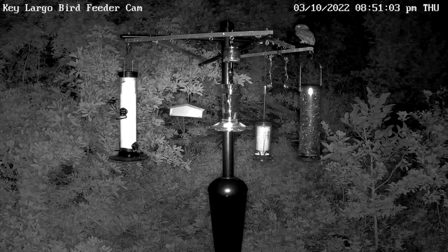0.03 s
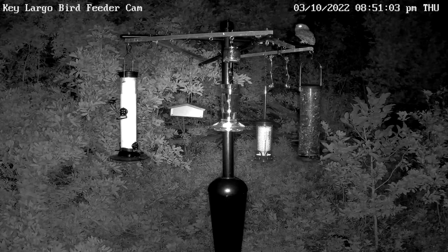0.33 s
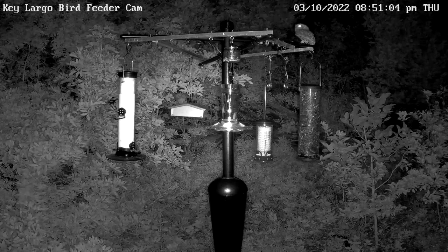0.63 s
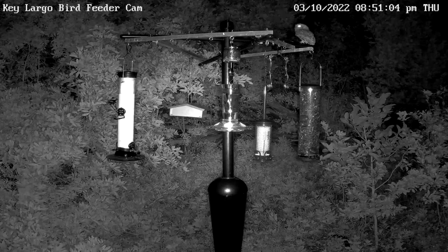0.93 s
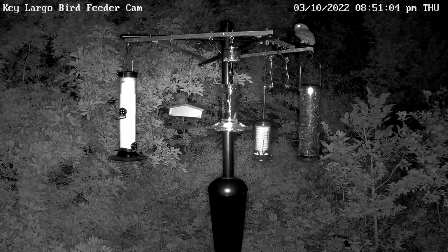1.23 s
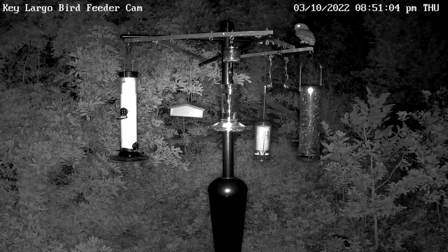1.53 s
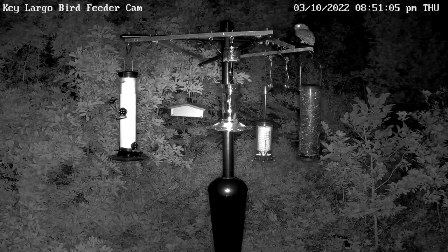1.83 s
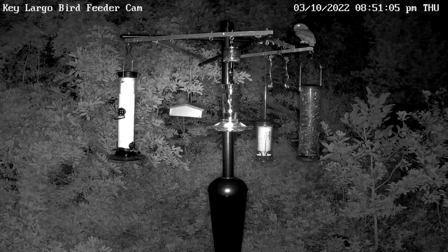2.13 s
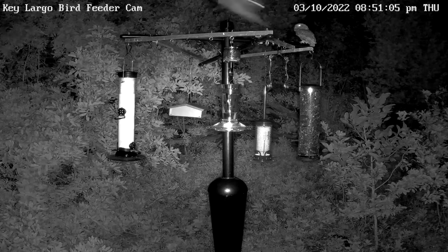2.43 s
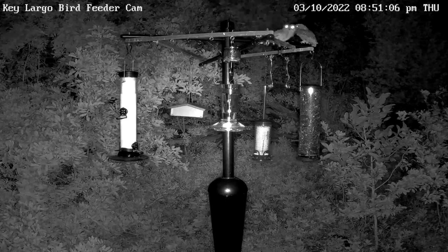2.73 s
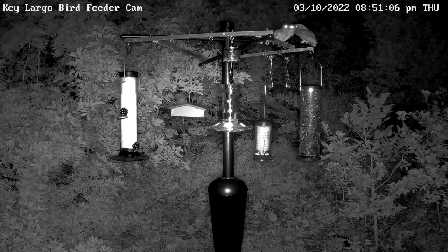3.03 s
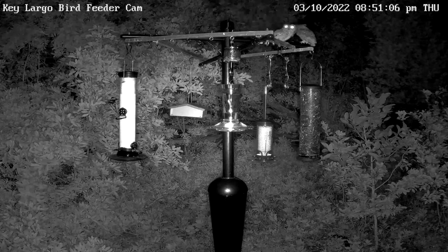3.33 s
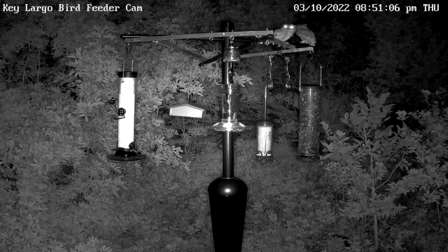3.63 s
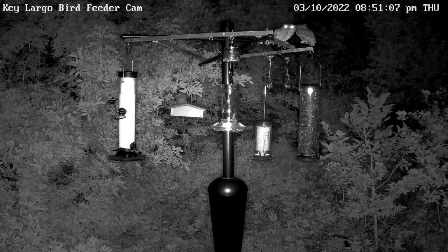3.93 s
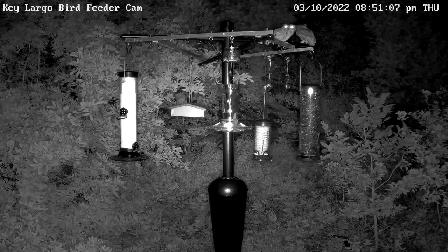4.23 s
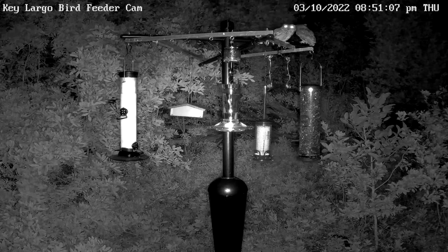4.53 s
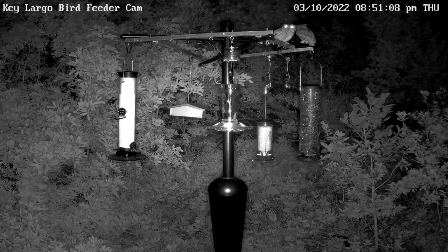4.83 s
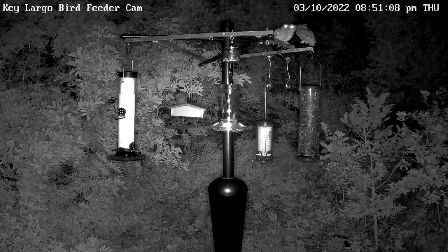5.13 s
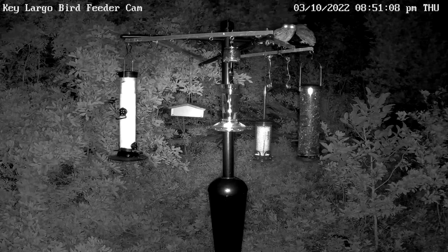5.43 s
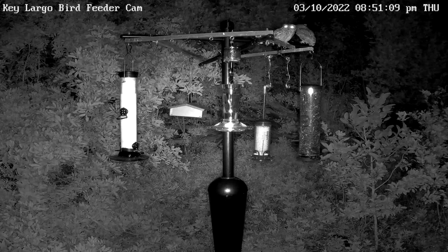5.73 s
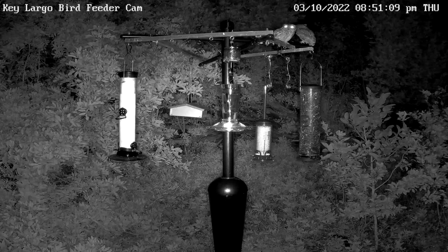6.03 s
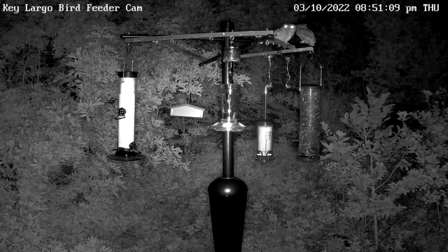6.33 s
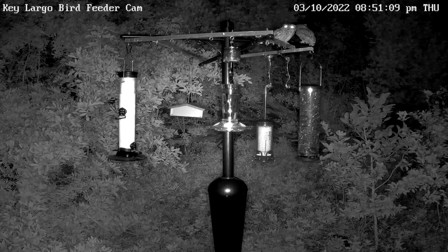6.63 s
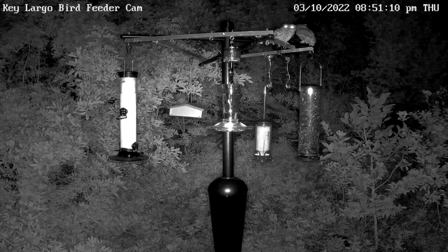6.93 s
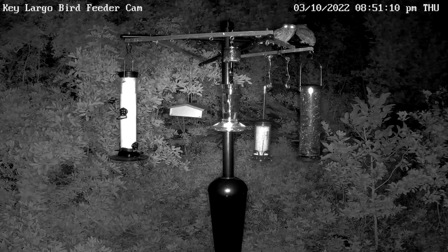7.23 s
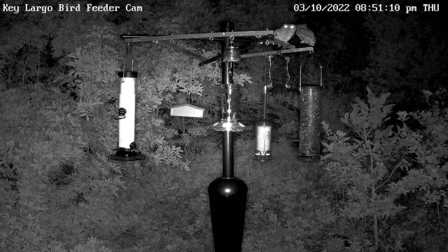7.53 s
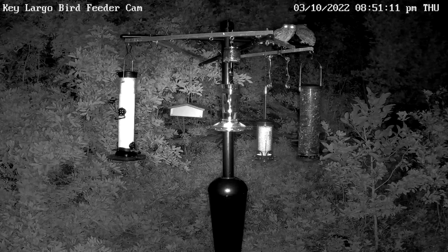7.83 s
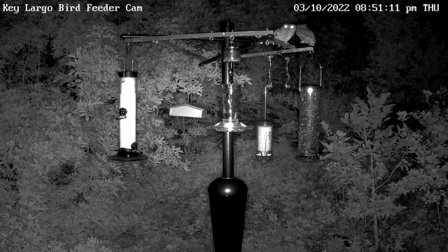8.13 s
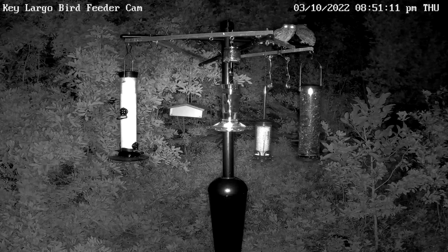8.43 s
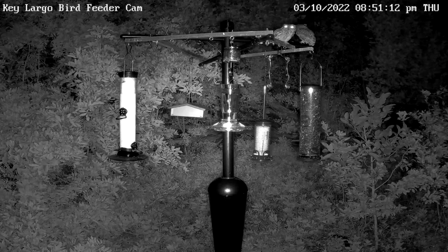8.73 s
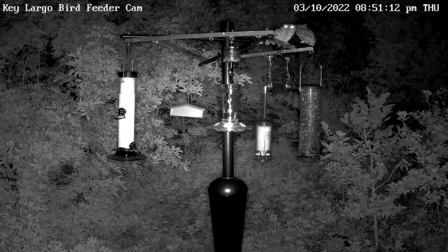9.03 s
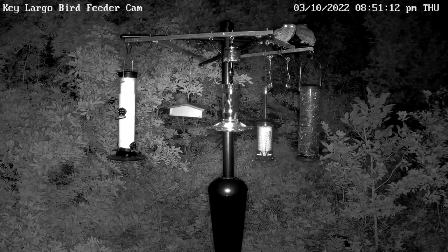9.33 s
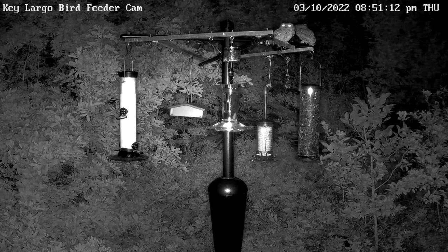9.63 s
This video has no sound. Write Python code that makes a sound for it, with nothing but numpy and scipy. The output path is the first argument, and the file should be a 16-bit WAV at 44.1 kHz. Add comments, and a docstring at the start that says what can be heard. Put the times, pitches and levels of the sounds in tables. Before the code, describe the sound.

Crickets chirp over steady hum and hiss while an owl whinnies twice, with faint ticks and squeaks from a metal bird feeder between the calls.

```python
"""A garden bird feeder at night, from an outdoor camera's microphone. Throughout, two near crickets
chirp with their wings over a faint far-off rush; light wind buffets the microphone, and the camera adds
mains hum, thin buzz and hiss. At 1.6 s a screech owl whistles a falling, quavering whinny with a breathy
tail. From 2.7 s another trills far off, while an owl lands on the metal feeder arm, which ticks under
its claws and squeaks under its weight. A second whinny follows at 5.7 s."""
import sys
import numpy as np
from scipy import signal
from scipy.fft import rfft, irfft, next_fast_len
from scipy.io import wavfile
from scipy.ndimage import map_coordinates

SR = 44100
rng = np.random.default_rng(int(sys.argv[2]) if len(sys.argv) > 2 else 0)


def digitize_waveform(pressure):
    """Quantize a signal to 16-bit integers and store it at the path in sys.argv[1].

    Rows of a 2-D input are taken as channels; values are limited to [-1, 1].
    """
    field = np.atleast_2d(pressure).T
    bounded = np.clip(field, -1, 1)
    quanta = np.round(bounded * 32767).astype(np.int16)
    wavfile.write(sys.argv[1], SR, quanta)


N = 431738

# the screech owl's calls: (first crest [s], length [s], pitch [Hz], fall [Hz], quaver rate [1/s],
# slowing [1/s^2], first and last pitch sag [share], deepest dip [dB], second and third harmonic [dB])
OWL_CALLS = [(1.601, .61, 958, 178, 16.7, 0, .035, .15, 20, -61.5, -47),
             (5.707, .79, 974, 205, 18, 3.5, .065, .14, 9.5, -46, -59)]
# effort through each whinny, an opening accent and then a swell: (time [s], level [dB])
OWL_EFFORT = [
    [(1.59, -29.5), (1.63, -43.5), (1.72, -37), (1.81, -26.5), (2.01, -26), (2.08, -31.5), (2.15, -29),
     (2.18, -52)],
    [(5.705, -31.5), (5.75, -43.5), (5.9, -36), (6.03, -38), (6.08, -27.5), (6.23, -27), (6.28, -33.5),
     (6.43, -36), (6.5, -40)],
]
# throat resonance that shapes the third harmonic: (frequency [Hz], gain [dB])
OWL_THROAT = [(1500, -30), (2550, -24), (2790, -9), (2890, 1.5), (3000, -7.5)]
# the first whinny's breathy tail, then far-off puffs of noise:
# (time [s], length [s], centre [Hz], relative level [dB])
TAIL_AND_PUFFS = [(2.148, 0.12, 700, -47), (2.614, 0.078, 660, -46), (4.08, 0.33, 520, -54),
                  (4.43, 0.12, 740, -48), (4.637, 0.066, 680, -45), (4.881, .1, 565, -47),
                  (4.982, 0.35, 705, -44.5), (8.804, 0.089, 320, -48), (8.97, 0.097, 598, -49.5)]
# the far owl's trill: (time [s], pitch [Hz], level [dB])
FAR_TRILL = [(2.7, 563, -68), (2.95, 550, -49), (3.3, 543.5, -46.5), (3.5, 535, -52.5), (3.7, 525, -44.5),
             (3.84, 505, -42.5), (3.95, 517, -75)]

# claws meet the feeder arm: (time [s], level [dB])
CLAW_HITS = [(2.733, -41.5), (2.765, -53), (2.795, -54)]
# spectrum of a claw's tick: (frequency [Hz], level [dB])
TICK_SPECTRUM = [(500, -21), (1800, -2), (2700, -1), (4000, -7.5), (6000, -7), (8000, -28)]
# the arm's ringing modes: (frequency [Hz], level [dB], time to fall 60 dB [s])
ARM_MODES = [(2520, 8, 0.077), (3310, 7.5, 0.27), (3580, 10.5, 0.14)]
# the arm's squeaks: (time [s], length [s], pitch [Hz], level [dB])
ARM_SQUEAKS = [(3.34, 0.065, 3524, -45.5), (3.375, 0.041, 2760, -42.5), (3.418, 0.031, 2730, -42),
               (3.445, 0.041, 2770, -41), (3.478, .045, 2052, -39.5), (3.519, 0.069, 2080, -51)]

# each near cricket's bouts: (first chirp [s], spacing [s], chirps [count], opening level [dB])
LOW_BOUTS = [(.054, .349, 3, -42), (1.57, .312, 3, -40), (2.535, .34, 5, -50), (4.227, 0.38, 2, -40.5),
             (4.897, .335, 1, -52), (5.226, .34, 3, -44), (6.165, 0.31, 3, -49), (7.17, 0.36, 8, -45)]
HIGH_BOUTS = [(.296, 0.42, 2, -47.5), (1.022, .298, 3, -51), (1.915, .377, 2, -48.5),
              (3.167, .793, 2, -43.5), (4.44, 0.44, 2, -41), (5.233, .375, 2, -48), (6.109, .367, 2, -51),
              (7.122, .36, 5, -45.5), (8.923, 0.4, 3, -44)]

# spectrum of the far-off rush: (frequency [Hz], level [dB])
RUSH_SPECTRUM = [(40, -22), (155, -3.5), (171, 9.5), (188, -3), (280, -1), (345, 2), (400, -1), (700, -1.5),
                 (950, -6), (1250, -10.5), (2000, -21), (4000, -46.5)]
# dim far-off tones: (time [s], length [s], start pitch [Hz], end pitch [Hz], level [dB])
DIM_TONES = [(5.223, 0.047, 214, 249.6, -42), (5.26, 0.084, 322, 358, -39.5), (7.553, 0.44, 350, 349, -47)]

# the dying breeze between gusts: (time [s], relative level [dB])
BREEZE_LEVEL = [(0, -17.5), (1.25, -18.5), (1.6, -21), (2.3, -23.5), (3.1, -23.5), (3.65, -28),
                (4.3, -23.5), (5.1, -28.5), (5.9, -30), (6.9, -24), (8, -30), (9.79, -33.5)]
# gusts on the microphone port: (time [s], half-length [s], rise [dB])
PORT_GUSTS = [(1.017, 0.063, 5.5), (1.37, 0.12, 4.5), (2.8, 0.08, 6), (4.122, .12, 7.5), (4.5, 0.12, 6.5),
              (4.782, 0.049, 13.5), (5.52, 0.15, 15.5), (6.612, 0.11, 4.5), (8.493, 0.055, 11)]
# sharp eddies on the port: (time [s], relative level [dB])
PORT_EDDIES = [(0.613, -11.5), (0.951, -21), (1.319, -20)]
# spectrum of the buffeting: (frequency [Hz], level [dB])
BUFFET_SPECTRUM = [(2, -29), (10, 1), (20, -8), (40, -13), (70, -22), (100, -30), (160, -43), (300, -62),
                   (1000, -100)]

# hum, buzz, hiss and far rush swell and sink together: (time [s], relative level [dB])
SHARED_SWELL = [(0, 3.1), (.45, 0.13), (1.8, .8), (2.8, 0.1), (3.8, -0.8), (4.05, 1.5), (5.25, 0),
                (5.58, 2.3), (5.9, 0), (6.5, -1), (6.9, 0.2), (8.1, -1.1), (8.85, .8), (9.25, -1.2),
                (9.79, -0.5)]
# partials of the hum: (multiple of the mains [-], relative level [dB])
HUM_PARTIALS = [(1, -0.5), (2, -21.5), (4, -42.5), (5, -38), (7, -49.5)]
# the buzz's bed of weak partials: (frequency [Hz], level of each [dB])
BUZZ_BED = [(1000, -74.5), (1400, -76.5), (2400, -70.5), (3000, -72), (3500, -62), (4100, -75),
            (4500, -80.5), (5500, -93.5), (6000, -110)]
# buzz partials with their own levels, most standing out as thin whines: (multiple [-], level [dB])
BUZZ_PARTIALS = [(18, -55), (33, -58), (35, -67), (37, -70), (40, -70.5), (46, -63), (47, -71), (49, -61),
                 (58, -61), (59, -60.5), (62, -71), (66, -57), (67, -64.5), (68, -64.5), (71, -64),
                 (72, -65.5), (74, -68.5)]
# buzz partials that drift in strength: (multiple, to be rounded [-], first level [dB], last level [dB])
BUZZ_DRIFTERS = [(56, -55, -54), (62.58, -50.5, -54.5), (83, -69.5, -74.5)]
# spectrum of the amplifier's hiss: (frequency [Hz], level [dB])
HISS_SPECTRUM = [(300, -3), (1200, -7), (1600, 0.5), (2000, -0.5), (2400, -2), (2900, 1.5), (3700, 2.5),
                 (4100, -3.5), (4600, -11.5), (7000, -13.5), (7900, -19.5), (8600, -38)]

BAND_LIMIT_HZ = 8700


def whinny(call, effort, onset_s=0.033, attack_s=0.018, release_s=0.03, accent_s=0.0496):
    """The screech owl's nearly pure whistle; level and pitch sag ever deeper between the quavers."""
    s, length, start_hz, fall_hz, rate, slowing, first_sag, last_sag, dip_db, second_db, third_db = call
    t = clock() - s
    progress = np.clip(t / length, 0, 1)
    trough = np.sin(np.pi * (rate * t - slowing * t * t / 2)) ** 2 * (t > 0)
    sag = first_sag + (last_sag - first_sag) * progress
    pitch = start_hz - fall_hz * progress ** 2.4  # holds, then falls ever faster
    pitch *= 1 - sag * trough + 0.00707 * wobble(150) + 0.006 * wobble(16)
    scoop = 0.061 * np.clip(-t / onset_s, 0, 1)
    pitch *= 1 + 0.035 * np.exp(-(t / accent_s) ** 2) - scoop  # slides up to a sharp opening note
    phase = 2 * np.pi * np.cumsum(pitch) / SR
    dip = dip_db * (sag / last_sag * trough) ** 2  # broad crests, short dips
    fundamental = amp(curves(effort)[0] - dip) * np.sin(phase)
    second = amp(second_db - 9 * progress - dip) * np.sin(2 * phase)
    third = amp(third_db + along(OWL_THROAT, 3 * pitch)) * np.sin(3 * phase)
    gate = np.clip((t + onset_s) / attack_s, 0, 1) * np.clip((length - t) / release_s + 1, 0, 1)
    roughness = amp(1.8 * wobble(120) + 1.4 * wobble(30))
    return gate * roughness * (fundamental + second + third)


def whinny_tail():
    """The screech owl's first whinny ends in a short breath."""
    return trees(puffs(TAIL_AND_PUFFS[:1]), t60=0.37, wet_db=-5)


def trill(pulse_hz=14, pitch_swing=0.038, dip_db=7):
    """A second owl, far from the microphone, holds a low note that pulses quickly."""
    pitch, db = curves(FAR_TRILL)
    t = clock()
    beat = np.cos(2 * np.pi * (pulse_hz * t + 0.1 * wobble(3)))
    phase = 2 * np.pi * np.cumsum(pitch * (1 + pitch_swing * beat)) / SR
    sounding = (t > FAR_TRILL[0][0]) & (t < FAR_TRILL[-1][0])
    return sounding * amp(db + dip_db * (beat - 1) / 2) * np.sin(phase)


def feeder(ring_db=-9, tick_t60=0.06, scrape_db=-49):
    """Claws tick and scrape on the metal arm, which then squeaks under the new weight."""
    out, t = np.zeros(N), np.arange(SR // 2) / SR
    for s, length, hz, db in ARM_SQUEAKS:
        add(out, s, amp(db) * note(length, hz, hz))
    out *= amp(2 * wobble(250))  # roughens the squeaks
    ring = sum(amp(db - 60 * t / t60) * np.sin(2 * np.pi * hz * t) for hz, db, t60 in ARM_MODES)
    for s, db in CLAW_HITS:
        tick = noise(TICK_SPECTRUM)[:len(t)] * amp(-60 * t / tick_t60)
        add(out, s, amp(db) * (tick + amp(ring_db) * ring))
    add(out, CLAW_HITS[0][0], amp(scrape_db) * puff(length=0.13, hz=3550, width=0.06))
    return trees(out, t60=0.19, wet_db=-10)


def crickets():
    """Two crickets near the microphone, and a faint third further off."""
    far_song = [(s + rng.normal(0, 0.04), rng.normal(-63, 2)) for s in np.arange(0.15, N / SR, 0.4)]
    low = cricket(chirps(LOW_BOUTS), wing_hz=6810, period_s=0.05, stroke_s=0.031, droop_hz=17)
    high = cricket(chirps(HIGH_BOUTS), wing_hz=6996, period_s=0.05, stroke_s=0.03, droop_hz=15)
    far = cricket(far_song, wing_hz=6730, period_s=0.059, stroke_s=0.034, droop_hz=15)
    return trees(low + high + far, t60=0.27, wet_db=-11)


def cricket(song, wing_hz, period_s, stroke_s, droop_hz):
    """A chirp is two closings of the wings, each a short, pure syllable."""
    out = np.zeros(N)
    for s, db in song:
        for k in range(2):
            syllable = amp(db + rng.normal(0, 1)) * note(stroke_s, wing_hz + droop_hz, wing_hz - droop_hz)
            add(out, s + k * period_s - stroke_s / 2, syllable)
    return out


def chirps(bouts, settled_db=-51, settle_s=0.66):
    """Each bout keeps an even beat and settles to a soft level: (time [s], level [dB]) per chirp."""
    return [(s + k * gap, settled_db + (db - settled_db) * np.exp(-(k * gap / settle_s) ** 2))
            for s, gap, count, db in bouts for k in range(round(count))]


def far_noise(rush_db=-45):
    """A soft rush in the distance, with a few dim tones and puffs in it."""
    tones = np.zeros(N)
    for s, length, start_hz, end_hz, db in DIM_TONES:
        add(tones, s, amp(db) * note(length, start_hz, end_hz))
    dim = tones * amp(3.3 * wobble(25)) + puffs(TAIL_AND_PUFFS[1:])
    rush = amp(rush_db + curves(SHARED_SWELL)[0] + 0.98 * wobble(6.4)) * noise(RUSH_SPECTRUM)
    return rush + trees(dim, t60=0.37, wet_db=-5)


def wind(gain_db=2, push_s=0.002):
    """A dying breeze with gusts pushes on the microphone port in lumps; the sharpest eddies thump."""
    gusts_db = sum(db * np.exp(-((clock() - s) / half) ** 2) for s, half, db in PORT_GUSTS)
    lumps = unit(noise(BUFFET_SPECTRUM) * amp(0.49 * wobble(19)))
    out = amp(curves(BREEZE_LEVEL)[0] + gusts_db + gain_db) * lumps
    u = np.arange(-SR // 50, SR // 50) / SR / push_s
    thump = u * np.exp(-u * u / 2)
    for s, db in PORT_EDDIES:
        add(out, s - len(thump) / 2 / SR, amp(db) * thump)
    return out


def hum(mains_hz=60, level_db=-20.5):
    """Mains hum picked up by the camera; it swells more widely than the hiss."""
    phase = 2 * np.pi * mains_hz * clock()
    wave = sum(amp(db) * np.sin(k * phase + rng.uniform(0, 2 * np.pi)) for k, db in HUM_PARTIALS)
    return amp(level_db + 1.48 * curves(SHARED_SWELL)[0] + 0.71 * wobble(8)) * unit(wave)


def electronics(repeat_hz=58.495, hiss_db=-48.5, size=4096):
    """Repeating interference in the camera lays a comb of thin lines over the amplifier's hiss."""
    orders = np.arange(size // 2 + 1)
    level_db = along(BUZZ_BED, orders * repeat_hz)
    for k, db in BUZZ_PARTIALS:
        level_db[round(k)] = db
    drifting = np.isin(orders, [round(row[0]) for row in BUZZ_DRIFTERS])
    steady = (orders > 0) & (orders * repeat_hz < BAND_LIMIT_HZ) & ~drifting
    phases = np.exp(2j * np.pi * rng.random(len(orders)))
    cycle = irfft(amp(level_db) * steady * phases) * size / np.sqrt(2)  # one period of the buzz
    turns = repeat_hz * clock() + 0.001 * wobble(3)
    whine = np.zeros(N)
    for k, first_db, last_db in BUZZ_DRIFTERS:
        drift = amp(np.linspace(first_db, last_db, N) - 1.05 * wobble(2))
        whine += drift * np.sqrt(2) * np.sin(2 * np.pi * round(k) * turns)
    buzz = amp(1.5 * wobble(6.5)) * np.interp(turns, np.arange(size) / size, cycle, period=1)
    hiss = amp(hiss_db) * noise(HISS_SPECTRUM)
    return amp(curves(SHARED_SWELL)[0]) * (whine + buzz + hiss)


def trees(x, t60, wet_db):
    """The direct sound plus its diffuse answer from the garden's trees."""
    t = np.arange(SR) / SR
    tail = rng.standard_normal(SR) * amp(-60 * t / t60)
    return x + amp(wet_db) * signal.fftconvolve(x, tail / np.linalg.norm(tail))[:N]


def note(length, start_hz, end_hz):
    """A gliding sine that swells and fades."""
    u = np.linspace(0, 1, int(length * SR))
    turns = np.cumsum(start_hz + (end_hz - start_hz) * u) / SR + rng.random()
    return np.sin(np.pi * u) * np.sin(2 * np.pi * turns)


def puffs(rows):
    """A track with one soft puff for each row."""
    out = np.zeros(N)
    for s, length, hz, db in rows:
        add(out, s, amp(db + 1) * puff(length, hz, width=0.16))
    return out


def puff(length, hz, width):
    """A swell of noise in a band around hz; width is a share of hz."""
    n = int(length * SR)
    band = np.exp(-0.5 * ((np.fft.rfftfreq(SR, 1 / SR) / hz - 1) / width) ** 2)
    band_noise = irfft(rfft(rng.standard_normal(SR)) * band)[:n]
    return unit(band_noise) * np.sin(np.linspace(0, np.pi, n))


def noise(spectrum):
    """Coloured noise of rms 1."""
    return unit(filtered(rng.standard_normal(N), lambda hz: amp(along(spectrum, hz))))


def filtered(x, response):
    """x filtered by a gain that depends on frequency."""
    m = next_fast_len(N + SR // 2)
    return irfft(rfft(x, m) * response(np.fft.rfftfreq(m, 1 / SR)), m)[:N]


def wobble(rate):
    """A smooth random curve, rate knots a second."""
    return map_coordinates(rng.standard_normal(int(N * rate / SR) + 4), [clock() * rate])


def curves(rows):
    """One value per sample for each column after the time."""
    times, *columns = np.transpose(rows)
    return [np.interp(clock(), times, column) for column in columns]


def along(points, hz):
    """Interpolate (frequency, value) points on a log axis."""
    freqs, values = np.transpose(points)
    return np.interp(np.log(hz + 1), np.log(freqs + 1), values)


def add(track, s, sound):
    """Mix a sound into the track from time s on."""
    start = round(s * SR)
    part = sound[max(-start, 0):max(N - start, 0)]
    track[max(start, 0):][:len(part)] += part


def clock():
    """The time of each sample in seconds."""
    return np.arange(N) / SR


def amp(db):
    """Decibels to gain."""
    return 10 ** (np.asarray(db) / 20)


def unit(x):
    """x scaled to rms 1."""
    return x / np.sqrt(np.mean(x ** 2) + 1e-20)


def scene():
    """The garden at one microphone, from the owls in the trees to the camera's own noises."""
    calls = sum(whinny(call, effort) for call, effort in zip(OWL_CALLS, OWL_EFFORT))
    owls = trees(amp(-1) * calls + trill(), t60=0.3, wet_db=-15.5) + whinny_tail()
    return (owls + crickets() + feeder() + far_noise() + wind() + hum() + electronics())[None]


def record(dry):
    """The camera keeps nothing above its band limit."""
    return filtered(dry[0], lambda hz: hz < BAND_LIMIT_HZ)[None]


dry = scene()
out = record(dry)
digitize_waveform(out)
```